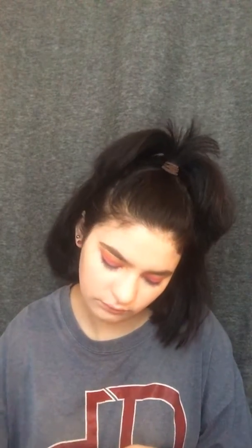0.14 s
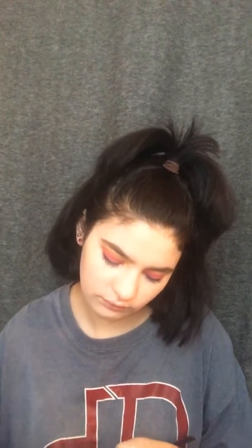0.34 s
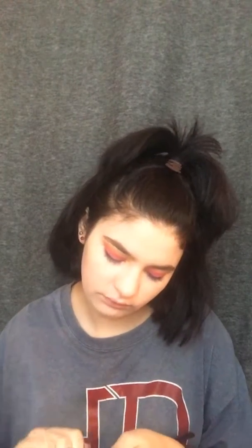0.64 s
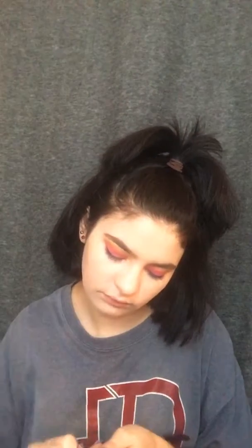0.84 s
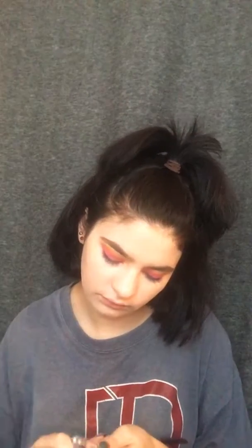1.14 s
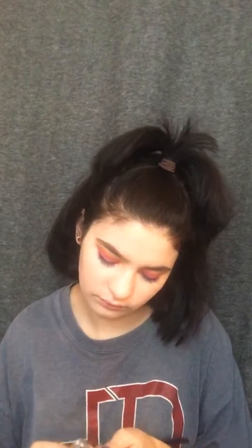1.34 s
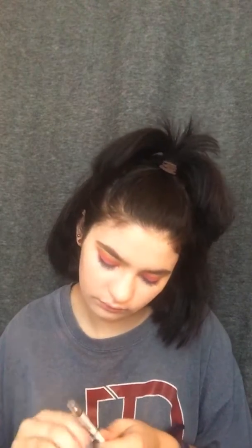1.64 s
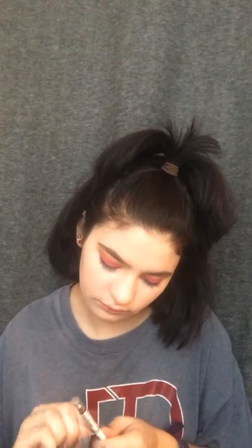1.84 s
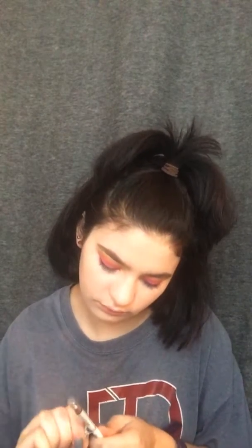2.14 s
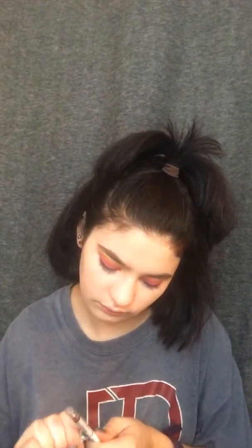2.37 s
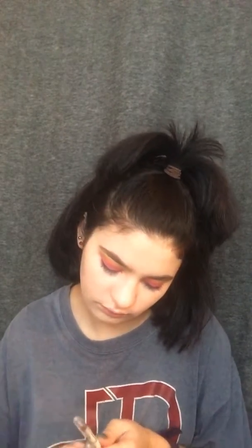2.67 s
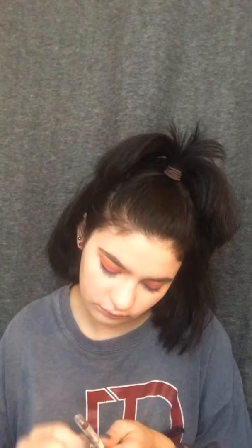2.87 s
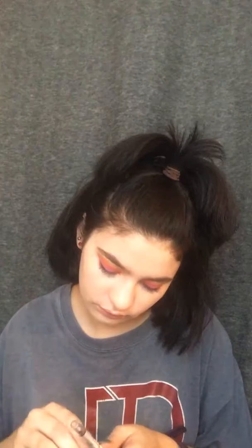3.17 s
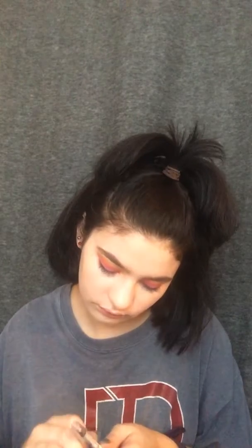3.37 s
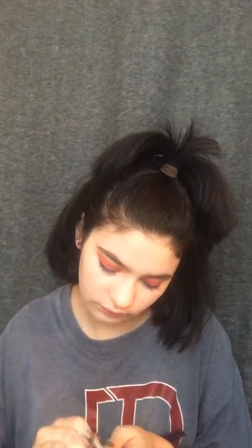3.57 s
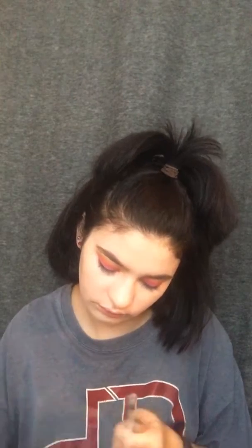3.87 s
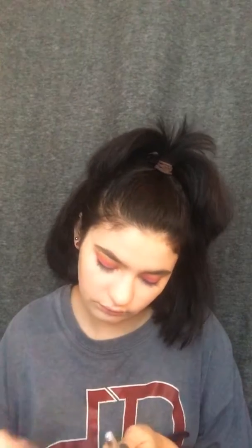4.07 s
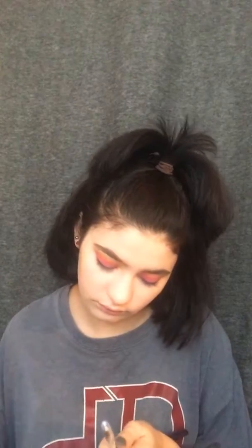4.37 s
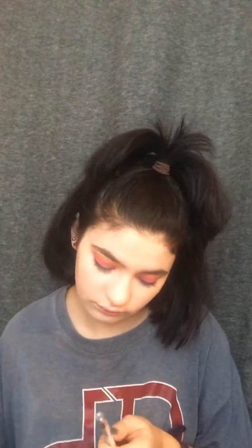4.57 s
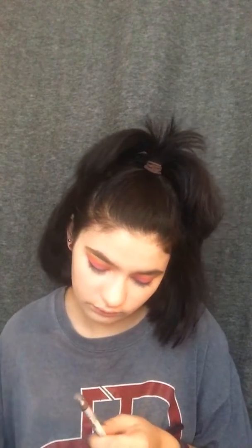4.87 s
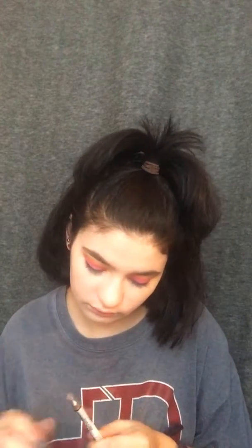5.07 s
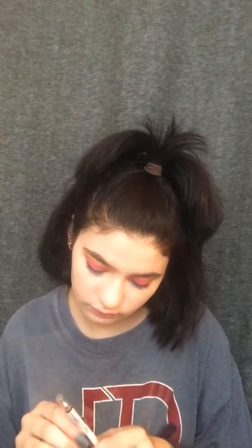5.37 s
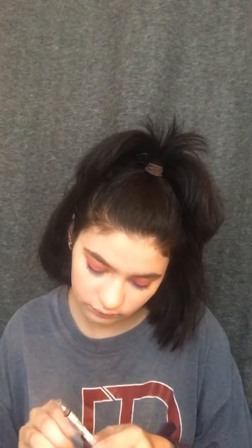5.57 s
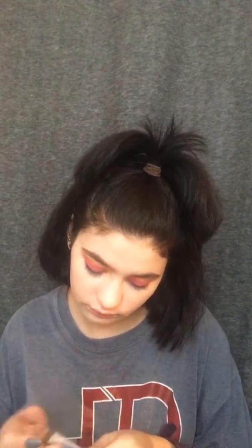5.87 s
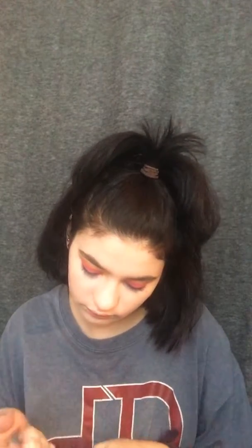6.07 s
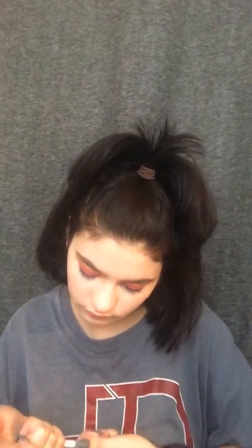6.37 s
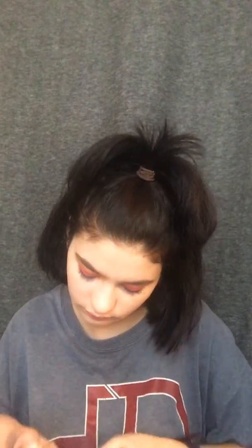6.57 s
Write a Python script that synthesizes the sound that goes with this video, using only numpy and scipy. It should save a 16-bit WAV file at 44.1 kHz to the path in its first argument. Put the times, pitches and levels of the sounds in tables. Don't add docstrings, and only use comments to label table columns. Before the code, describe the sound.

Sparse clicks and taps of hands handling a plastic pen close up, one tiny squeak and a sharp cap snap, over a faint surging low drone.

```python
import sys
import numpy as np
from scipy import signal
from scipy.fft import rfft, irfft, next_fast_len
from scipy.io import wavfile
from scipy.ndimage import uniform_filter1d

SR = 44100
rng = np.random.default_rng(int(sys.argv[2]) if len(sys.argv) > 2 else 0)


def master(y):
    cut = np.clip(np.atleast_2d(y).T, -1, 1)
    pcm = np.round(cut * 32767)
    wavfile.write(sys.argv[1], SR, pcm.astype(np.int16))


def elevation(decibels):
    levels = np.asarray(decibels, float)
    return 10 ** (levels / 20)


N = 296352

# frequency in Hz, density in dB per Hz.
HISS_SPECTRUM = [(120, -1.5), (250, 0), (500, -4.5), (1000, -7.5), (2000, -9.5), (4000, -14), (6500, -18),
                 (8000, -22), (9800, -22.5), (12000, -24), (15200, -26), (16000, -28), (22000, -40)]
# frequency in Hz, density in dB per Hz.
RUMBLE_SPECTRUM = [(20, -41.5), (30, -12.5), (45, 0.5), (58, -7.5), (72, 1), (100, -5.5), (150, -12),
                   (300, -39.5), (700, -76.5), (2000, -120)]
# frequency in Hz, width in Hz, level in dB.
HUM_LINES = [(142.2, 6.12, -85.5), (238, 8, -83.5)]
# middle in seconds, length in seconds, level in dB.
DRONE_SURGES = [(0.183, 0.19, -58), (0.362, .2, -57.5), (.6, 0.18, -60), (0.718, 0.16, -58),
                (0.974, 0.16, -68), (1.112, 0.087, -57.5), (1.28, 0.22, -62), (1.445, 0.29, -61.5),
                (1.69, 0.24, -60.5), (2.127, 0.51, -59), (2.448, 0.11, -62), (2.753, 1, -69),
                (3.184, 0.26, -60), (3.417, 0.075, -62), (3.59, 0.19, -58), (3.901, .3, -63.5),
                (4.2, 0.22, -63.5), (4.379, 0.23, -62.5), (4.557, 0.12, -53), (4.722, 0.091, -64.5),
                (4.946, 0.26, -61.5), (5.3, 0.7, -65), (5.776, 0.37, -60.5), (6.046, .12, -58),
                (6.208, 0.24, -60), (6.436, 0.086, -63), (6.648, 0.17, -57.5)]
IDLE_DB = -73

# frequency in Hz, T60 in seconds.
ROOM_T60 = [(700, 0.36), (2000, 0.19), (5000, 0.22), (13000, 0.19)]
# delay in seconds, level in dB.
NEAR_ECHOES = [(.0019, -37.5), (.0033, -17), (.0048, -16.5), (.0085, -26.5)]

# middle in seconds, length in seconds, level in dB, centre in Hz, width in octaves.
FINGER_STROKES = [(0.405, .14, -75.5, 3240, 1.2), (0.469, 0.057, -72, 3480, 0.82),
                  (0.585, 0.12, -76, 4150, 1.8), (1.453, .05, -64, 4000, 2.2), (1.716, .03, -74, 6000, 2),
                  (1.933, .06, -83, 9000, 1.5), (2.5, .08, -82, 10830, 0.96), (2.876, .05, -69, 3900, 1.5),
                  (3.382, .04, -65, 4900, 2), (4.106, .03, -75, 2980, 1.5), (4.238, .04, -64, 5020, 2.3),
                  (4.261, .03, -58.5, 5950, 2.8), (4.307, .05, -70, 6000, 1.7),
                  (4.431, .06, -68.5, 5940, 1.72), (4.457, .04, -58, 2493, 2.3),
                  (5.375, .025, -74, 5280, .4), (5.724, .12, -71.5, 980, 1.14),
                  (5.991, 0.16, -77.5, 5020, 1.8), (6.326, 0.33, -70.5, 2600, 1.57),
                  (6.656, .15, -67.5, 2220, 1.63)]
# time in seconds, rate in slips per second, level in dB.
THREAD_SLIPS = [
    (1.9565, 430, -63),
    (1.961, 390, -46),
    (1.9673, 720, -62),
    (1.971, 290, -55),
    (1.98, 265, -68),
]

PART_CENTRES_HZ = [1400, 2550, 4900, 8500, 13000]
# frequency in Hz, width in Hz, weight in dB.
PEN_MODES = [(2530, 395, 1.5), (4230, 330, 4), (5585, 170, 7), (6530, 220, 7), (9000, 780, 2),
             (11260, 1100, 0), (13400, 620, 1)]
# start in seconds, level in dB, frequency in Hz, width in Hz.
HELD_MODES = [(0.235, -40, 1100, 800), (.4948, -44, 2650, 300), (0.9802, -40, 2600, 450),
              (.9835, -46, 800, 600), (1.462, -46.5, 2600, 303), (1.8235, -52.5, 4210, 251),
              (1.8247, -51, 2900, 300), (1.9996, -37, 1600, 1100), (2.9055, -43.5, 770, 250),
              (2.9068, -42, 1500, 400), (3.5126, -49.5, 2730, 355), (3.8135, -48, 654, 298.3),
              (3.814, -19.5, 5550, 702.6), (3.838, -45, 300.3, 252), (3.848, -46, 664, 250),
              (4.4545, -46, 1570, 295), (5.5788, -42, 2535, 447), (6.0724, -49.5, 5060, 600),
              (6.1291, -31, 1460, 710), (6.5054, -49.5, 2130, 405.6), (6.5323, -55, 1908, 500),
              (6.5761, -41.5, 1900, 502), (6.5764, -44.5, 3975, 600)]
# start in seconds, body level in dB, place (0 grip .. 4 tip), nail level in dB.
CAP_SNAP = [(3.7914, -31, 2.32, -34), (3.8103, -7.5, 1.3, -23.5), (3.8122, -6.5, 1.35, -28),
            (3.814, 3.5, 1.47, 0.5), (3.8172, -10.5, 0.47, -7.5), (3.8213, -22.5, 0.3, -15),
            (3.8263, -21.5, 0.97, -25.5), (3.8346, -19.5, 0.57, -22), (3.8363, 6, 1.24, -9.5),
            (3.8371, -2, 1.15, -2), (3.8379, 9.5, 1.62, 7.5), (3.8434, -15, 1.3, -18.5),
            (3.8468, 6, 1.2, -10), (3.8488, 5, 1.4, -18)]
# start in seconds, body level in dB, place (0..4), nail level in dB.
CLEAN_BLOWS = [
    (.9802, -5.5, 2.48, -4.5),
    (1.8896, -19, 3.7, -35),
    (6.129, -0.5, 0.73, -42),
]
# start in seconds, body level in dB, place (0..4), nail level in dB.
OPEN_TAPS = [(.237, -13.5, 1.37, -25.5), (.4844, -18, 0.64, -32), (0.4918, -26, 1.1, -56),
             (0.4947, -14.5, 1.14, -16), (.8856, -16, 1.38, -16), (.8965, -18, 2.45, -43),
             (.9217, -27, 1.7, -27), (.9808, -27, 1.6, -28), (0.9831, -16, 0.31, -20.5),
             (1.4611, -14, 0.85, -45), (1.6371, -19.5, 1.9, -38), (1.661, -20.5, 1.37, -35),
             (1.8239, -22, 0.87, -23.5), (1.9985, -14.5, 2.3, -22.5), (2.8938, -10, 1.5, -16.5),
             (2.9045, -13.5, 2.33, -44), (2.9068, -14.5, 1.65, -19.5), (3.379, -26, 1.5, -30),
             (3.5122, -24, 2.7, -22), (4.0042, -20, 0.9, -22), (4.2629, -20, 1.56, -36),
             (4.269, -25, .5, -43.5), (6.0714, -17.5, 1.34, -34), (6.5056, -21.5, 0.84, -36.5),
             (6.576, -14.5, 1.55, -19.5)]
# start in seconds, body level in dB, place (0..4), nail level in dB.
HIDDEN_TAPS = [
    (4.4524, -19, 1.5, -27),
    (4.671, -14, 3.13, -29.5),
    (4.6722, -14, 0.84, -35),
    (5.5779, -8, 2.07, -16.5),
    (5.5792, -17.5, 1.4, -25),
]
# start in seconds, level in dB, place (0..4).
SOFT_TOUCHES = [(.184, -32, 1.85), (0.227, -30.5, 2), (.23, -28, 2.4), (.4754, -36, 1.2),
                (0.4868, -19, 0.72), (0.649, -33, 0.8), (1.4489, -28, 0.81), (1.454, -31, 0.46),
                (1.4583, -26, 1.4), (1.6126, -39, 1.7), (1.7615, -30.5, 1.7), (2.8237, -38.5, 2.4),
                (2.8736, -31, 1.5), (2.8894, -25, 1.6), (3.0194, -25, 0.45), (3.3845, -26.5, 1.2),
                (4.2315, -29.5, .3), (4.2364, -30.5, 1.2), (4.2426, -24.5, 0.32), (4.2977, -28, 1.4),
                (4.304, -28.5, 1.7), (4.4321, -32.5, 1), (4.4371, -27, 2.5), (4.458, -21, 0.84),
                (4.7258, -41, 2.5), (4.815, -31.5, 2.4), (5.6457, -29, 0.94), (6.5096, -33, .5),
                (6.5791, -27, 0.39)]
# start in seconds, level in dB, place (0..4).
NAIL_TICKS = [(.1571, -39, 3.5), (.5822, -40, 3.8), (0.6662, -34, 2.9), (.6684, -42, 4), (.7453, -43, 4),
              (.8764, -39, 3.8), (.8875, -34, 4), (1.7917, -41, 3.7), (1.8767, -46, 4), (1.8926, -42, 3.8),
              (2.0778, -50, 4), (2.4653, -36, 3.9), (2.479, -30.5, 3.8), (2.4888, -39, 3.5),
              (2.5002, -40, 3.4), (2.6214, -30, 3.2), (2.8566, -46, 4), (3.231, -33, 3), (3.2345, -28, 3.6),
              (3.366, -37, 3.2), (3.3967, -36, 4), (3.4615, -43, 4), (3.4737, -36, 4), (3.4912, -45, 4),
              (4.248, -33, 3), (4.4294, -47, 3.5), (4.4403, -38, 3.6), (4.808, -37.5, 2.7),
              (4.8547, -37.5, 3), (5.5721, -45, 2.4)]

FADE_DOWN_DB, FADE_UP_DB, NAIL_FADE_DB = 13, 13.5, 9.5
NAIL_PLACE, FLESH_DB = 3.85, -17
SHAKE_DB = -23.5
CRISP_DB, CLEAN_DB, LOOSE_DB, MUFFLED_DB = -9, -11, -5.5, 1
SHADOW_DB = -1.5
SNAP_ROOM_DB, THUD_ROOM_DB = -3.5, -5.5


def unit(x):
    return x / np.sqrt(np.mean(x ** 2) + 1e-20)


def along(points, hz):
    f, v = np.transpose(points)
    return np.interp(np.log(hz + 1), np.log(f + 1), v)


def filtered(x, response):
    m = next_fast_len(x.shape[-1] + 8192)
    return irfft(rfft(x, m) * response(np.fft.rfftfreq(m, 1 / SR)), m)[..., :x.shape[-1]]


def noise(response):
    return unit(filtered(rng.standard_normal(N), response))


def peak(hz, centre_hz, width_hz):
    return 1j * hz * width_hz / (centre_hz ** 2 - hz ** 2 + 1j * hz * width_hz)


def causal(gain_db, size):
    cepstrum = irfft(np.log(elevation(gain_db)), size)
    fold = np.r_[1, 2 * np.ones(size // 2 - 1), 1, np.zeros(size // 2 - 1)]
    return np.exp(rfft(cepstrum * fold))


def throb():
    t = np.arange(N) / SR
    level = elevation(IDLE_DB)
    for middle_s, length_s, db in DRONE_SURGES:
        phase = np.clip((t - middle_s) / (1.225 * length_s), -.5, .5)
        level = level + elevation(db) * np.cos(np.pi * phase) ** 2
    return level


def background():
    drift = signal.hilbert(noise(lambda hz: peak(hz, 58.83, 8.8) ** 2))
    drone = throb() * unit(np.real(drift / (np.abs(drift) + 0.29)))
    lines = sum(elevation(db) * noise(lambda hz: peak(hz, c, w) ** 2) for c, w, db in HUM_LINES)
    rumble = elevation(-66.5) * noise(lambda hz: elevation(along(RUMBLE_SPECTRUM, hz)))
    hiss = elevation(-68.5) * noise(lambda hz: elevation(along(HISS_SPECTRUM, hz)) * (hz > 60))
    return drone + lines + rumble + hiss


def room(direct, around, size=882):
    out = np.pad(direct, (0, SR))
    for delay_s, db in NEAR_ECHOES:
        out[round(delay_s * SR):][:N] += elevation(db) * direct
    for start in range(0, N, size):
        block = around[start:start + size]
        if np.abs(block).max() < 1e-5:
            continue
        hz, t, z = signal.stft(rng.standard_normal(SR // 4), SR, nperseg=128)
        decay = elevation(-60 * t / along(ROOM_T60, hz)[:, None])
        tail = signal.istft(z * decay, SR, nperseg=128)[1]
        age_s = np.arange(len(tail)) / SR
        tail = tail * np.minimum(age_s / 0.001, 1)
        wet = signal.fftconvolve(block, tail / np.linalg.norm(tail))
        out[start:][:len(wet)] += elevation(-3) * wet
    return out[:N]


def strokes():
    out = np.zeros(N + SR)
    for middle_s, length_s, db, centre_hz, octaves in FINGER_STROKES:
        n = round(length_s * SR)
        carrier = rng.standard_normal(SR // 2)
        unevenness_db = 4.5 * uniform_filter1d(rng.standard_normal(SR // 2), size=40) * 7.4
        colour = lambda hz: np.exp(-2 * (np.log2((hz + 1) / centre_hz) / octaves) ** 2)
        rub = unit(filtered(carrier * elevation(unevenness_db), colour))[:n]
        out[round(middle_s * SR) - n // 2:][:n] += elevation(db) * np.hanning(n) * rub
    return out[:N]


def squeak():
    s, rate, level_db = np.transpose(THREAD_SLIPS)
    t = np.arange(s[0], s[-1], 1 / SR)
    count = np.floor(np.cumsum(np.interp(t, s, rate)) / SR)
    slips_s = t[np.flatnonzero(np.diff(count))]
    force = np.zeros(N)
    force[np.round(slips_s * SR).astype(int)] = elevation(np.interp(slips_s, s, level_db) + 18.5)

    def cap(hz):
        high = peak(hz, 12600, 1800) ** 2
        low = elevation(-5) * peak(hz, 6300, 1500) ** 2
        return high - low + elevation(-12) * peak(hz, 10000, 2500)

    return filtered(force, cap)


def parts_db(body_db, place, nail_db):
    part = np.arange(len(PART_CENTRES_HZ))
    fade_db = np.where(part < place, FADE_DOWN_DB, FADE_UP_DB)
    body = body_db - fade_db * np.abs(part - place)
    nail = nail_db - NAIL_FADE_DB * np.abs(part - NAIL_PLACE)
    return 10 * np.log10(elevation(2 * body) + elevation(2 * nail) + elevation(2 * (body_db + SHAKE_DB)))


def strike(levels_db, chatter_db, size=1024):
    hz = np.fft.rfftfreq(size, 1 / SR)
    t_ms = np.arange(size) * 1000 / SR
    chatter = rng.standard_normal(size) * (rng.random(size) < .4) * elevation(chatter_db - 20 * t_ms / 3.2)
    chatter[:12] *= .3
    force = np.where(np.arange(size) == 12, 1, chatter)
    low = [(150, levels_db[0] - 35), (600, levels_db[0] - 21)]
    high = [(15600, levels_db[-1] - 7.5), (18000, levels_db[-1] - 25)]
    shares_db = along([*low, *zip(PART_CENTRES_HZ, levels_db), *high], hz)
    grip = .3 + .5 * rng.random(len(PEN_MODES))
    modes_db = sum(2.1 * g * db * np.abs(peak(hz, c, w)) ** 2 for g, (c, w, db) in zip(grip, PEN_MODES))
    direct = causal(shares_db + modes_db, size) * rfft(force / np.linalg.norm(force))
    around = causal(shares_db + 0.383 * modes_db - 4.5, size)
    return irfft([direct, around], size)


def contacts():
    out = np.zeros((2, N + SR))
    t = np.arange(SR // 10) / SR
    faint = [(s, db, place, db + FLESH_DB) for s, db, place in [*SOFT_TOUCHES, *NAIL_TICKS]]
    groups = [  # contacts, micro-contact dB, gain dB of the direct and all-round paths
        (CAP_SNAP, CRISP_DB, [[0], [SNAP_ROOM_DB]]),
        (CLEAN_BLOWS, CLEAN_DB, 0),
        ([*OPEN_TAPS, *faint], LOOSE_DB, 0),
        (HIDDEN_TAPS, MUFFLED_DB, [[SHADOW_DB], [0]])]
    for rows, chatter_db, paths_db in groups:
        for s, *contact in rows:
            hit = elevation(paths_db) * strike(parts_db(*contact), chatter_db)
            start = round(s * SR)
            out[:, start:start + hit.shape[1]] += hit
    for s, db, hz, width_hz in HELD_MODES:
        build = np.minimum(t * hz, 1)
        swing = np.sin(2 * np.pi * hz * t) * np.exp(-np.pi * width_hz * t) * build
        start = round(s * SR)
        out[:, start:start + len(t)] += elevation(db + 8.5) * elevation([[0], [THUD_ROOM_DB]]) * swing
    return out[:, :N]


def scene():
    floor = background()
    direct, around = contacts() + squeak() + strokes()
    return (room(direct, around) + floor)[None]


def low_pass(x):
    return signal.sosfilt(signal.butter(12, 16820, fs=SR, output="sos"), x)


def record(dry):
    mix = filtered(dry, lambda hz: 1 - 0.357 * peak(hz, 10450, 590))
    return low_pass(mix)


dry = scene()
out = record(dry)
master(out)
```